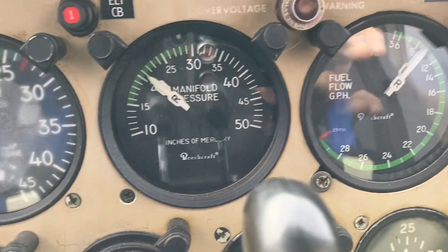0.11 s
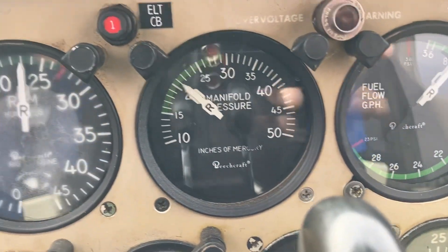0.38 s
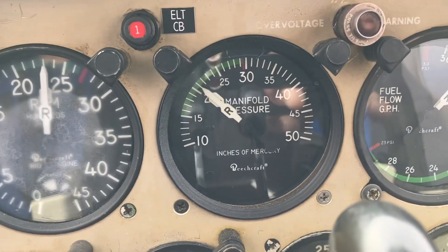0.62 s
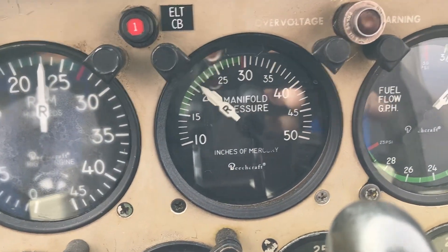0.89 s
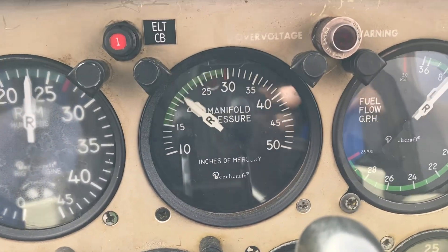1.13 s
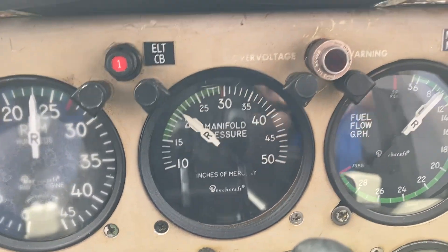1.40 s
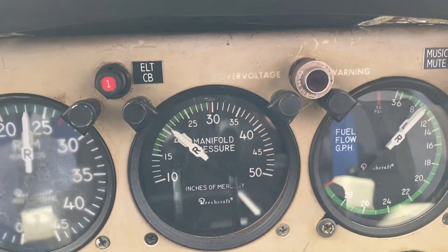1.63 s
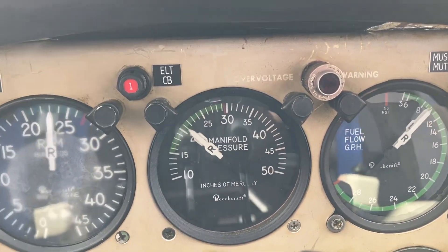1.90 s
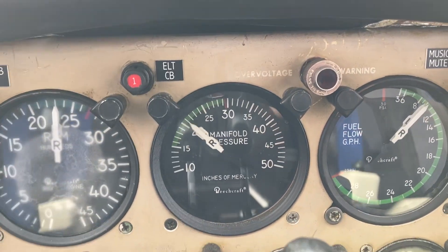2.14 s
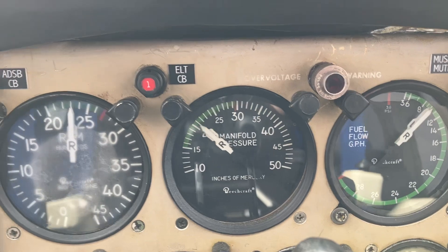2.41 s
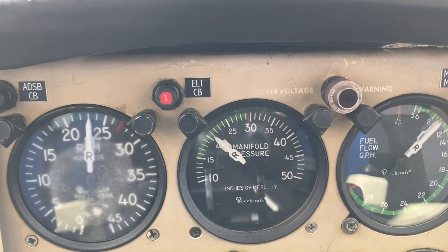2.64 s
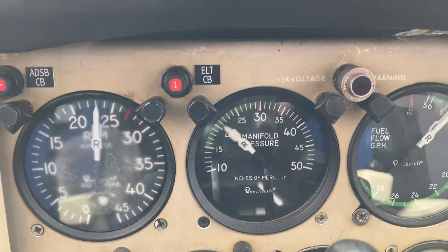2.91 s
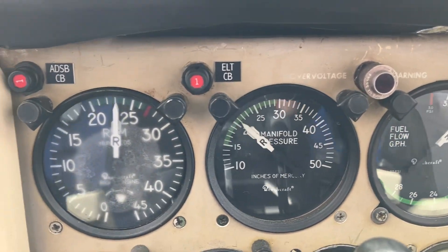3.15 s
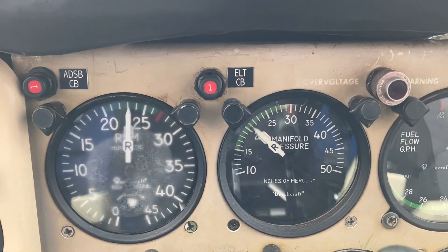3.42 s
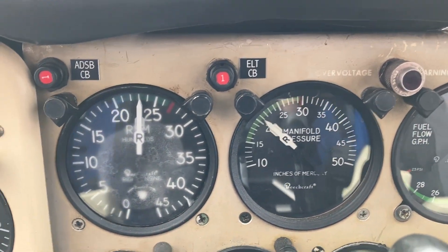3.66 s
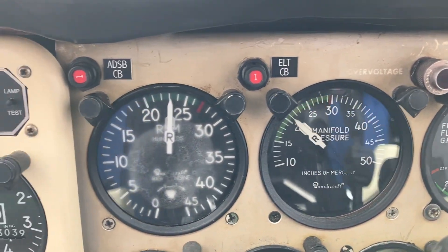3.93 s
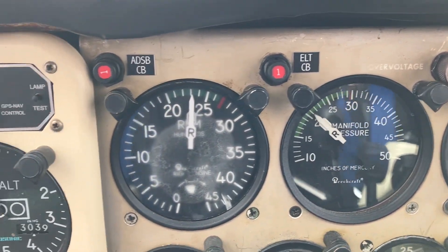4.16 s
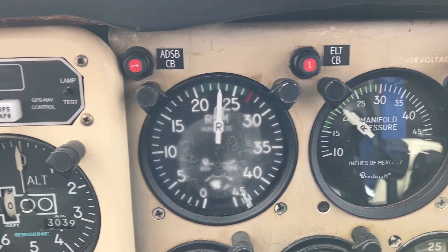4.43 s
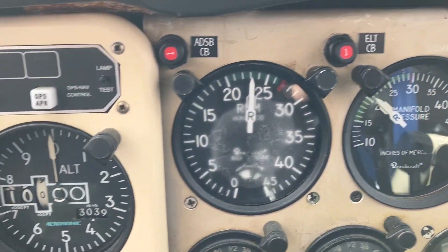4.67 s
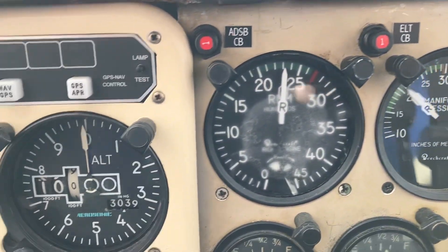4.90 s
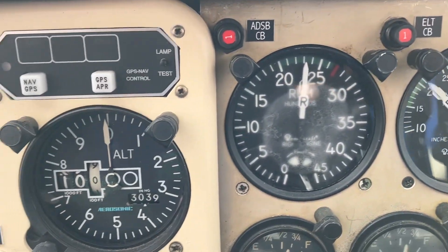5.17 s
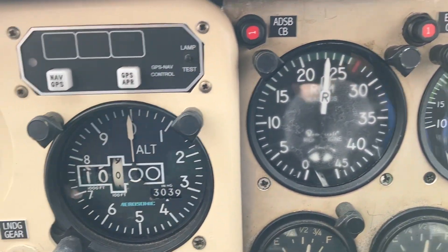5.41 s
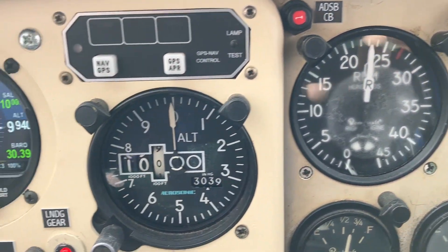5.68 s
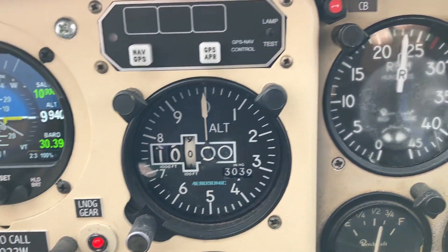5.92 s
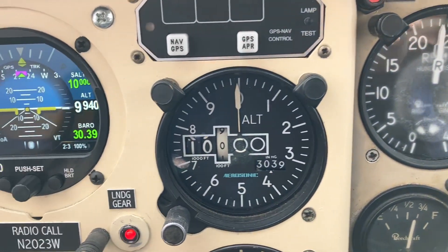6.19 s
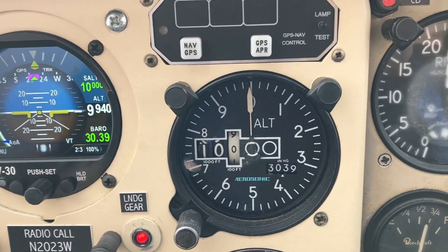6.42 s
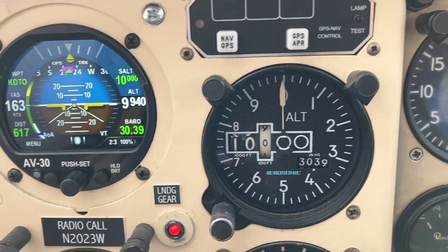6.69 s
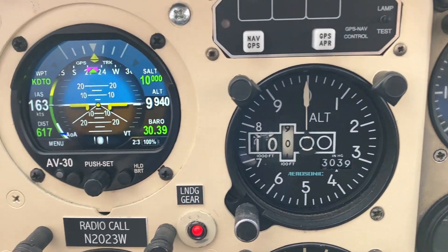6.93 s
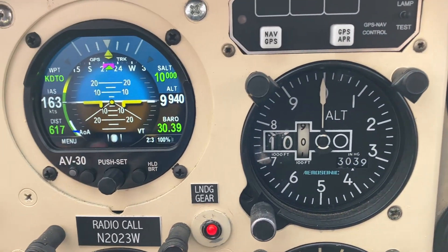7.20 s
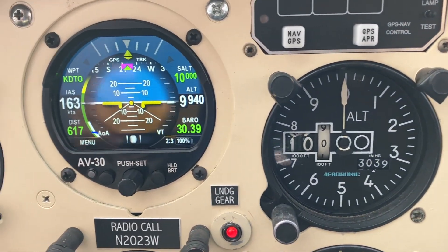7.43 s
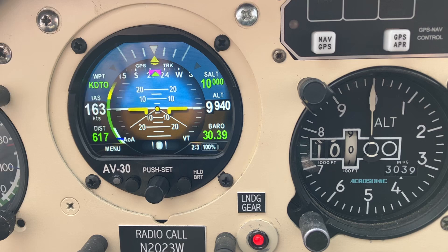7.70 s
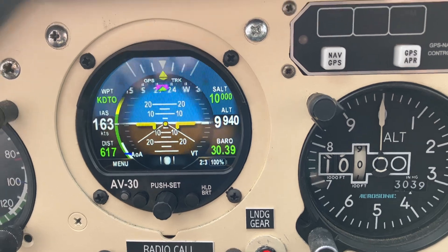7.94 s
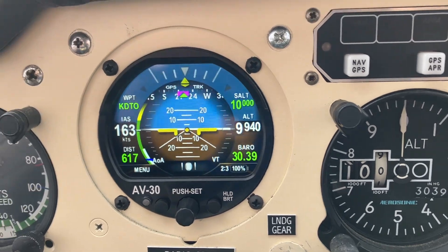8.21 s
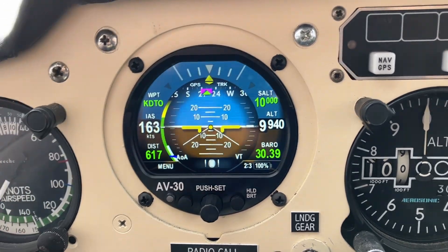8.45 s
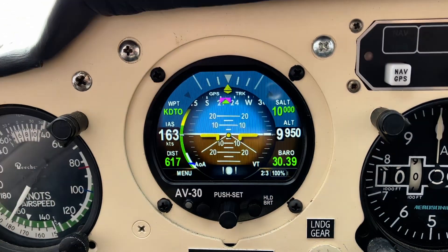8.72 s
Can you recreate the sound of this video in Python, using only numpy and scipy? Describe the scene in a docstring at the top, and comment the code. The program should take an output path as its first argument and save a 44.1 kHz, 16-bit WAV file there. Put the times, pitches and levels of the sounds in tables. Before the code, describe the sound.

For nearly 9 seconds, a small twin-engine aircraft cruises steadily, heard inside its cabin. From 0 s a heavy, low drone near 115 Hz dominates, with weaker engine and propeller harmonics around it. The two engines run almost together, so individual harmonics swell and fade very slowly while the main hum stays firm. Beneath and around it, slipstream rumble is boxy and slightly gusty, coloured by cabin resonances. Above, air leaking at a door seal makes a wide, fluttering hiss. Around 2.3-3.5 s a thin whistly band stands out faintly in the hiss; others surface near 4-5 s, 6-7 s and 8-8.8 s. The hand-held stereo phone drifts mostly from the right of the panel to the left between 2 and 8.2 s, subtly changing low resonances and overtones. Everything continues unbroken to the end, with no start, stop or separate events.

```python
"""Two piston engines with three-blade propellers drone in cruise; run a hair apart, their orders beat slowly.
Each order is a pair of sines. Slipstream rumble is noise shaped by the cabin's resonances; an air leak hisses
as noise with a straight path and cabin echoes, and narrow bands of it stand out or sink for a while.
Heard at the left and right ports of a hand-held phone that drifts across the panel of a small aircraft."""
import sys
import numpy as np
from scipy import signal
from scipy.fft import rfft, irfft, next_fast_len
from scipy.io import wavfile
from scipy.ndimage import uniform_filter1d, map_coordinates

SR = 44100
rng = np.random.default_rng(int(sys.argv[2]) if len(sys.argv) > 2 else 0)


def store_pcm(level_fs):
    """Save levels as 16-bit WAV."""
    pcm = np.round(np.clip(level_fs, -1, 1) * 32767).astype(np.int16)
    wavfile.write(sys.argv[1], SR, np.atleast_2d(pcm).T)


def magnitude_from_level(level_db):
    """Linear magnitude for a level in decibels (20 dB per decade)."""
    exponent = np.asarray(level_db, float) / 20
    return 10 ** exponent


N = 389381

# engine cycles a second: half the shaft speed
NEAR_HZ, FAR_HZ = 19.069, 19.101
# delay of the left port after the right; the farther engine's tones come round the cabin and lag more
PORT_LAG_S, FAR_LAG_S = 0.00022, 0.00079
# left minus right, at (right, left) of the panel
DRONE_LEAN_DB, WAVE_LEAN_DB = (-0.5, 0.5), (4, -2)
WAVE_HZ, WAVE_WIDTH_HZ = 597, 87  # standing wave across the cabin
HISS_TOP_HZ = 15750
HISS_LEFT_DB = -1.2  # the leak is farther off at left of the panel
PATCH_WIDTH_HZ = 36
PATCH_GLIDE_HZ = 400  # rise from right to left of the panel


def along(table, hz):
    """Each column after the frequency, interpolated on a log frequency axis."""
    f, *cols = np.transpose(table)
    return np.array([np.interp(np.log(hz + 1), np.log(f + 1), c) for c in cols])


def drift(s):
    """Place of the hand-held phone along the panel at times s."""
    # the phone's path: (time [s], place [0 right - 1 left])
    path = [(0, 0.17), (2, .04), (3, .12), (4, 0.3), (5, 0.35), (6, 0.62), (7, 0.72), (8.2, 1), (8.83, .9)]
    return np.clip(np.interp(s, *np.transpose(path)), 0, 1)


def wobble(rate):
    """Smooth random curve through rate knots a second."""
    return map_coordinates(rng.standard_normal(N // 100), [np.arange(N) * rate / SR])


def filtered(x, response):
    """x times a complex response of frequency."""
    m = next_fast_len(N + 8192)
    return irfft(rfft(x, m) * response(np.fft.rfftfreq(m, 1 / SR)), m)[..., :N]


def lean(place, lean_db):
    """Gains of the left and right ports, splitting a level difference that follows the place."""
    return magnitude_from_level(np.outer([0.5, -0.5], np.interp(place, [0, 1], lean_db)))


def engines():
    """Firing and blade tones of both engines; each order swells when the two fall in step."""
    # tones, rms before port lag and lean: (order of the cycle [-], near level [dB], far level [dB],
    # time in step [s], centre gain at left of the panel [dB])
    orders = [(2, -51, -56, 0.27, 0), (3, -39, -43.5, 5.65, -1.5), (4, -49, -41, 4, -3),
              (5, -49, -39, 1, -5), (6, -12, -34, 1.6, 0.2), (9, -52, -52, 0.81, 12.5),
              (12, -40.5, -41, 0.55, 8), (14, -56, -57, 3, -10), (15, -40, -48, 0.3, -7),
              (16, -61, -58, 0.38, 5), (18, -54.5, -60, 0.1, 12.5), (20, -52.5, -56, 1.4, -13),
              (24, -50, -56, 1.2, -2), (30, -58, -59, 0.5, 2)]
    t = np.arange(N) / SR
    place = drift(t)
    ports = np.zeros((2, N))
    for order, near_db, far_db, beat_s, left_db in orders:
        start = rng.uniform(0, 2 * np.pi)
        for hz, db, lag_s in ((NEAR_HZ, near_db, PORT_LAG_S), (FAR_HZ, far_db, FAR_LAG_S)):
            phase = start + 2 * np.pi * order * hz * (t - beat_s)
            phase = phase + 0.003 * order * wobble(rate=1.64)
            half_lag = np.pi * order * hz * lag_s
            peak = np.sqrt(2) * magnitude_from_level(db)
            centre = peak * magnitude_from_level(left_db * place) * np.cos(phase) * np.cos(half_lag)
            apart = peak * np.sin(phase) * np.sin(half_lag)
            ports += [centre + apart, centre - apart]
    return lean(place, DRONE_LEAN_DB) * ports


def white(channels):
    """Noise of unit power per Hz."""
    return rng.standard_normal((channels, N)) * np.sqrt(SR / 2)


def echoed(noise, channels, echo_share, focus):
    """Cabin echoes comb noise, unlike in each channel; focus lets narrow bands stand out or sink for a while."""
    # narrow bands, gain before focus: (middle [s], length [s], frequency [Hz], gain [dB])
    patches = [(1.202, 9.6, 2660, -3.5), (2.902, 1.2, 3450, 12.5), (4.7, 4.4, 2440, 4),
               (4.3, 0.68, 3090, 6), (6.4, .9, 3850, 8), (6.6, 1.2, 2760, 7), (8.4, 1.5, 2198, 9),
               (8.5, 0.51, 2755, 10)]
    hz, s, z = signal.stft(noise, SR, nperseg=2048)
    field = rng.standard_normal((2, channels, len(hz), len(s)))
    for _ in range(2):  # about 80 Hz wide and 1.5 s long
        field = uniform_filter1d(field, size=3, axis=2)
        field = uniform_filter1d(field, size=45, axis=3)
    echoes = (field[0] + 1j * field[1]) / field.std()
    paths = np.sqrt(1 - echo_share) + np.sqrt(echo_share / 2) * echoes
    patch_db = 0
    for mid_s, length_s, at_hz, gain_db in patches:
        patch_hz = at_hz + PATCH_GLIDE_HZ * (drift(s) - drift(mid_s))
        off_time = (2 * (s - mid_s) / length_s) ** 4
        off_pitch = ((hz[:, None] - patch_hz) / PATCH_WIDTH_HZ) ** 2
        patch_db = patch_db + focus * gain_db * np.exp(-off_time - off_pitch)
    return signal.istft(z * paths * magnitude_from_level(patch_db), SR, nperseg=2048)[1][:, :N]


def rumble():
    """Slipstream in the cabin's standing waves, whose strengths change with the place along the panel."""
    # spectra before fade, gusts and lean; apart = half the left-right difference, before port lag:
    # (frequency [Hz], centre at right [dB/Hz], centre at left [dB/Hz],
    # apart at right [dB/Hz], apart at left [dB/Hz])
    resonances = [(25, -74, -66, -84, -73), (40.2, -58, -60, -74, -77), (90, -49.5, -50, -70, -69),
                  (135, -51, -45, -64, -62), (170.3, -53.5, -45.5, -67, -55), (219, -61, -57, -70, -59),
                  (293, -52, -55.5, -75, -65), (351, -65.5, -67, -69, -69), (455.4, -57, -56.5, -68, -65),
                  (479, -62.5, -67.5, -70, -72), (565, -67.5, -66, -70, -69), (592, -69, -56, -60, -68),
                  (630, -75, -65.5, -73, -76), (740, -68, -69.5, -66.5, -67), (980, -73, -75, -75.5, -73.5),
                  (1410, -81, -77.5, -74, -74)]

    def colour(hz):
        fade = 1 / (1 + (hz / 1700) ** 8)  # the hiss takes over above
        return magnitude_from_level(along(resonances, hz)) * fade

    place = drift(np.arange(N) / SR)
    noise = echoed(white(channels=4), channels=4, echo_share=0.048, focus=0)
    right, left, apart_right, apart_left = filtered(noise, colour)
    gust = magnitude_from_level(1.13 * wobble(rate=8))
    centre = gust * (np.sqrt(1 - place) * right + np.sqrt(place) * left)
    apart = np.sqrt(1 - place) * apart_right + np.sqrt(place) * apart_left
    # low sound reaches the left port later: first-order delay by the slope
    low = filtered(centre, lambda hz: 1 / (1 + (hz / 400) ** 4))
    apart = apart - PORT_LAG_S / 2 * SR * np.gradient(low)
    ports = np.array([centre + apart, centre - apart])
    wave = filtered(ports, lambda hz: np.exp(-((hz - WAVE_HZ) / WAVE_WIDTH_HZ) ** 2))
    return ports + wave * (lean(place, WAVE_LEAN_DB) - 1)


def hiss():
    """Air at a door seal: a straight path to both ports, its cabin echoes, and the diffuse rush of other leaks."""
    # spectrum before path gains, flutter and drift: (frequency [Hz], left [dB/Hz], right [dB/Hz])
    hiss_spectrum = [(1500, -74, -70.5), (2020, -73.5, -72), (2590, -64.5, -67), (3230, -69.5, -70),
                     (3870, -73, -74), (5840, -74.5, -71.5), (6670, -72, -69.5), (7250, -74.5, -74),
                     (9500, -78.5, -78.5), (10930, -79.5, -79.5), (13800, -91, -91), (15600, -90, -94.1)]
    # power weight of the straight path: (frequency [Hz], share [0-1])
    direct_share = [(1500, 0.5), (2600, 0.24), (3600, 0.19), (5500, 0.1), (7200, 0.76), (8800, 0.95),
                    (11500, 0.88), (15000, 1)]
    # lead of the left port on the straight path: (frequency [Hz], lead [cycles])
    port_lead = [(1500, .5), (2700, 0), (3500, -.5), (4300, -.9), (5600, -.6), (7250, -1), (9050, -1.5),
                 (11550, -2), (13550, -2.5), (15800, -3)]

    def colour(hz):
        rise = 1 / (1 + (1400 / (hz + 1)) ** 8)
        return magnitude_from_level(along(hiss_spectrum, hz)) * rise * (hz < HISS_TOP_HZ)

    def straight_response(hz):
        cycles = np.interp(hz, *np.transpose(port_lead))
        turn = np.exp(1j * np.pi * np.outer([1, -1], cycles))
        return colour(hz) * np.sqrt(along(direct_share, hz)) * turn

    def scattered_response(hz):
        return colour(hz) * np.sqrt(1 - along(direct_share, hz))

    leak, others = white(channels=1), white(channels=2)
    straight = filtered(echoed(leak, channels=1, echo_share=0.025, focus=1), straight_response)
    around = 0.75 * echoed(leak, channels=2, echo_share=0.99, focus=0.92)
    around = around + 0.77 * echoed(others, channels=2, echo_share=0.24, focus=0.95)
    scattered = filtered(around, scattered_response)
    # each path flutters on its own
    straight = magnitude_from_level(0.68 * wobble(rate=21)) * straight
    scattered = magnitude_from_level(0.84 * wobble(rate=19)) * scattered
    return magnitude_from_level(HISS_LEFT_DB * drift(np.arange(N) / SR)) * (straight + scattered)


def scene():
    """Engines, rumble and hiss at the left and right ports."""
    return engines() + rumble() + hiss()


def low_pass(x):
    """Removes everything above the highest recorded frequency."""
    return signal.sosfilt(signal.butter(12, 17120, fs=SR, output="sos"), x)


def record(dry):
    """The phone stores the sound of its two ports."""
    return low_pass(dry)


dry = scene()
out = record(dry)
store_pcm(out)
```